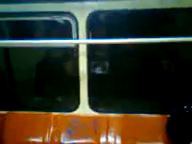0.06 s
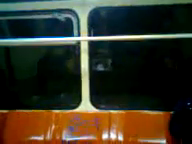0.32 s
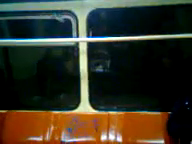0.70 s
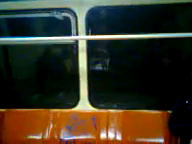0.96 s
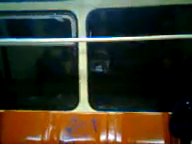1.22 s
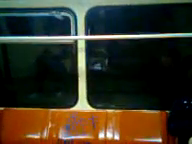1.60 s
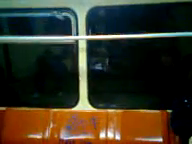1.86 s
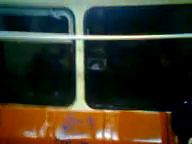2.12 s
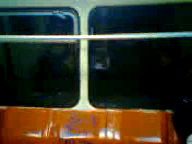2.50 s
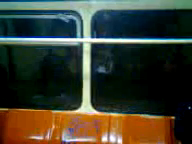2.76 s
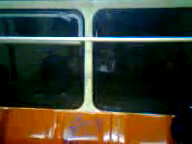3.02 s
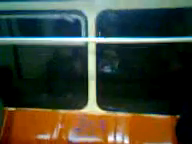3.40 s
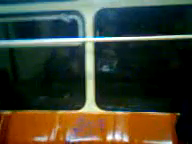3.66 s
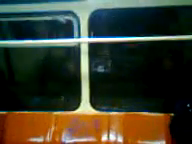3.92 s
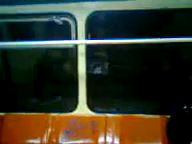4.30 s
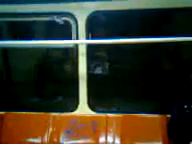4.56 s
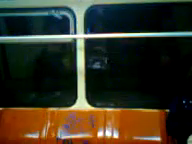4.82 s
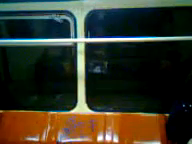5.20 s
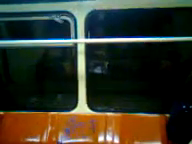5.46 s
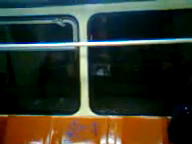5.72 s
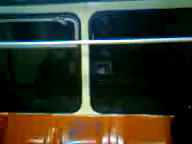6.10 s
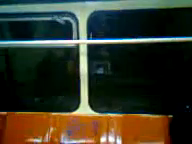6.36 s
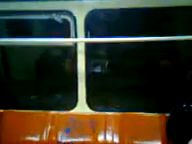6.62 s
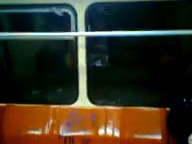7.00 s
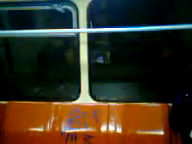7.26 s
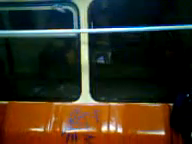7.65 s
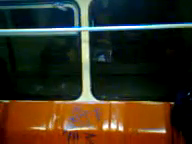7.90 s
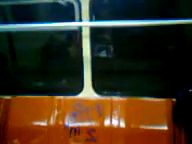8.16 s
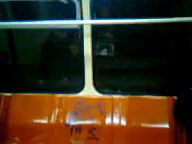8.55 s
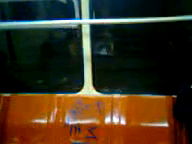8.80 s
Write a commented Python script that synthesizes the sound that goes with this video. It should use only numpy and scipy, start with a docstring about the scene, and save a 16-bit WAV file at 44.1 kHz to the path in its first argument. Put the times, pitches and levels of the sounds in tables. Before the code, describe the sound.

A deep rumble and a hissing roar of steel wheels fill a metro carriage slowing in a tunnel. Behind them a fluttering motor whine gradually sinks over a low air drone. The wheels knock and clatter over rail joints, once early and in a cluster midway, with brief rasping squeals. The loudest clatter and squealing come at the end, clipping with a faint crackle. Heard from a seat, the sound is dull and narrow-band.

```python
"""A deep rumble and a roar of wheels on rails, heard inside a metro carriage slowing in a tunnel.
Rough steel rolling on steel shakes the body and hisses; the wheels knock and clatter over rail joints.
Their flanges (the rims that keep them on the track) rub and ring, hardest at the end.
Behind this the motor's whine sinks and air drones in the tunnel.
The sound is dull and narrow-band, and its loudest peaks clip with a faint crackle."""
import sys
import numpy as np
from scipy import signal
from scipy.fft import rfft, irfft, next_fast_len
from scipy.io import wavfile
from scipy.ndimage import uniform_filter1d, map_coordinates

SR = 44100
rng = np.random.default_rng(int(sys.argv[2]) if len(sys.argv) > 2 else 0)


def unload_audio(sound):
    """Save the sound as a 16-bit wav file, at the path given as the first command line argument."""
    columns = np.transpose(np.atleast_2d(sound))
    # keep every value between -1 and 1, then stretch to whole-number steps
    steps = np.round(np.clip(columns, -1, 1) * 32767)
    wavfile.write(sys.argv[1], SR, steps.astype(np.int16))


N = 389844
TIME = np.arange(N) / SR
WHINE_HZ, FALL_HZ_PER_S = 610.4, 17.5  # the motor's starting pitch, and its fall as the train slows


# the tone of the rumble: (frequency [Hz], relative level [dB])
RUMBLE_TONE = [(15, -50.5), (30, -40), (55, -17.5), (100, -18), (160, -8.5), (230, -2), (295, 2),
               (400, -.5), (520, -4.5), (680, -12), (1000, -21), (2000, -52)]
# the carriage shudders over uneven track: (time [s], length [s], level [dB])
TRACK_SHUDDERS = [(.05, 0.32, -42), (.68, 0.48, -39), (1.31, 0.047, -33.5), (1.506, 0.033, -35),
                  (2.566, 0.073, -34.5), (3.346, .1, -32), (3.48, 0.053, -29), (3.675, 0.38, -31.5),
                  (4.075, .17, -34), (4.608, 0.23, -27), (5.14, 0.14, -31.5), (5.42, 0.29, -36),
                  (6.446, .08, -34.5), (6.96, 1.6, -33), (7.05, 0.18, -30.5), (7.48, 0.21, -32),
                  (7.983, .06, -30.5), (8.17, 0.14, -29), (8.452, 0.074, -23.5), (8.512, .17, -17),
                  (8.71, 0.092, -16.5)]

def body_rumble():
    """Rolling wheels shake the carriage body, harder where the track is uneven."""
    steady_db = -38 - 1.6 * np.log2(speed())  # 1.6 dB louder at half speed
    shaking = swelling(steady_db, TRACK_SHUDDERS, attack_s=0.01, release_s=0.066)
    return shaking * amp(1.2 * wobble(16)) * patchy(noise(colour(RUMBLE_TONE)), depth_db=1.6)


# the tones of the roar and of the hiss: (frequency [Hz], relative level [dB])
ROAR_TONE = [(150, -21), (350, -6), (520, 2.5), (640, 5), (760, 0), (1000, -0.1), (1280, -1), (1540, 2.5),
             (1850, 0.64), (2200, -10.5), (3000, -17.5), (4400, -41.5)]
HISS_TONE = [(900, -33.5), (1600, -11.5), (2000, 1), (2350, 2.5), (2700, 0.5), (3000, 1), (3300, 3.5),
             (3550, 2.5), (3900, -2), (4600, -8), (5200, -46.5)]
# the steady hiss, a little softer once the train is slower: (time [s], level [dB])
HISS_LEVELS = [(0, -34), (2.0, -33), (3.6, -32.5), (4.5, -35.5), (6.0, -36.5), (8.3, -35.5)]
# wheels grind over rough rail: (time [s], length [s], roar level [dB], hiss level [dB])
ROUGH_STRETCHES = [(0.273, 0.12, -33.5, -35), (0.926, 0.22, -49, -31.5), (1.01, 0.071, -30.5, -32),
                   (1.115, 0.13, -35, -39), (1.946, 0.054, -33.5, -33.5), (3.368, 0.12, -31.5, -38.5),
                   (3.787, .5, -32.5, -34.5), (3.82, 0.032, -21.5, -28), (3.921, .07, -25.5, -29.5),
                   (4.031, 0.17, -39, -31), (4.638, 0.41, -32, -32), (4.702, 0.25, -29, -30.5),
                   (7.544, 0.11, -33.5, -40), (7.902, 0.087, -33.5, -35.5), (8.095, 0.19, -30, -35),
                   (8.19, 0.039, -40, -36), (8.376, .05, -37, -27), (8.42, .12, -22, -24),
                   (8.53, .26, -22.5, -21), (8.576, 0.046, -20, -20), (8.739, 0.015, -19.5, -31)]

def wheel_roar_and_hiss(attack_s=0.0078, release_s=0.05):
    """Rough steel rolls on steel: the tunnel roars, and the spot where they touch hisses and crackles."""
    start, length, roar_db, hiss_db = np.transpose(ROUGH_STRETCHES)
    steady_roar_db = -31 + 8 * np.log2(speed())  # 8 dB softer at half speed
    roar_gain = swelling(steady_roar_db, zip(start, length, roar_db), attack_s, release_s)
    hiss_gain = swelling(curve(HISS_LEVELS), zip(start, length, hiss_db), attack_s, release_s)
    roar = roar_gain * amp(0.6 * wobble(22)) * patchy(noise(colour(ROAR_TONE)), depth_db=1.66)
    grit = unit(filtered(impacts(per_second=550, spread_db=3.5), colour(HISS_TONE)))
    hiss = patchy(noise(colour(HISS_TONE)), depth_db=2.5)
    return roar + hiss_gain * amp(0.64 * wobble(45)) * unit(hiss + amp(-6) * grit)


# wheels hit rail joints: (time [s], thump level [dB], clatter level [dB], time to fade by 60 dB [s])
JOINT_HITS = [(1.05, -27, -31.5, .3), (3.685, -31.5, -33, 0.36), (3.821, -37.5, -17, 0.66),
              (3.974, -31, -30.5, 0.35), (4.635, -19.5, -22.5, 0.23), (4.751, -35.5, -19.5, 0.59),
              (4.955, -25, -26, 0.32), (5.29, -34, -47, 0.18), (8.426, -22, -20.5, 0.99),
              (8.557, -17.5, -17.5, 0.32), (8.583, -13.5, -25.5, 0.26), (8.644, -18.5, -24, .2),
              (8.73, -17.5, -21.5, .25), (8.79, -14, -31.5, 0.24)]
# the notes the carriage booms at: (frequency [Hz], width [Hz], relative level [dB])
CARRIAGE_NOTES = [(235, 57, -13), (313, 79, -2), (331, 45, -1), (420, 70, -9), (480.5, 37, -3.5),
                  (675, 130, -21.5)]
# the tone of loose steel: (frequency [Hz], relative level [dB])
STEEL_TONE = [(20, -33), (90, -0.5), (250, -7.5), (500, 1.5), (950, 4.5), (1350, -11), (1900, -12.5),
              (2600, 5.5), (3500, -5.5), (4600, -10), (6000, -35)]

def joint_knocks(attack_s=0.016):
    """Each joint thumps the carriage and sets loose steel clattering; the tunnel draws the sound out."""
    thump_gain, clatter_gain = np.zeros((2, N))
    for start, thump_db, clatter_db, fade_s in JOINT_HITS:
        age = np.maximum(TIME - start, 0)
        blow = (1 - np.exp(-age / attack_s)) * amp(-60 * age / fade_s)
        thump_gain += amp(thump_db) * blow
        clatter_gain += amp(clatter_db) * blow
    rattle = unit(filtered(impacts(per_second=2500, spread_db=2.0), colour(STEEL_TONE)))
    boom = unit(np.tanh(0.88 * noise(resonances(CARRIAGE_NOTES))))  # the panels stiffen as they swing
    return thump_gain * boom + clatter_gain * rattle


# a flange rubs the rail and the wheel sings: (time [s], length [s], pitch [Hz], level [dB])
FLANGE_RUBS = [(1.024, 0.037, 3560, -26), (3.836, 0.079, 2390, -32), (3.873, 0.065, 3040, -30.5),
               (3.972, 0.076, 2310, -30.5), (4.155, 0.098, 3480, -32), (4.774, 0.025, 2350, -29),
               (8.121, 0.066, 3510, -38.5), (8.399, 0.066, 3552, -14), (8.514, 0.033, 3527, -16)]
# the tone of a rasping wheel: (frequency [Hz], relative level [dB])
WHEEL_TONE = [(900, -24), (1700, -8), (1980, -2.5), (2100, -0.5), (2220, 2), (2400, 0.5), (2820, -4),
              (2960, 4), (3120, 0.5), (3700, -1), (4400, 1), (5000, -39)]

def flange_squeals(width_hz=180, rasp_db=-2.5):
    """A flange sticks and slips: the whole wheel rasps, and one of its notes sings and rings briefly."""
    squeals, pressure = np.zeros((2, N + SR))
    for start, length, hz, db in FLANGE_RUBS:
        rub = amp(db) * swell(TIME[:SR], length, attack_s=0.0045, release_s=0.053)
        narrow_band = signal.iirpeak(hz, hz / width_hz, SR)
        note = unit(signal.filtfilt(*narrow_band, rng.standard_normal(SR)))
        first = round(start * SR)
        squeals[first:first + SR] += rub * unit(np.tanh(note))  # friction limits the swing
        pressure[first:first + SR] += rub
    return squeals[:N] + amp(rasp_db) * pressure[:N] * noise(colour(WHEEL_TONE))


# how loud the motor whines: (time [s], level [dB])
WHINE_LEVELS = [(0, -44), (1.1, -45.5), (2.1, -40.5), (3.4, -42), (4.3, -47), (5.0, -37), (5.6, -43),
                (6.25, -44), (6.55, -35.5), (6.85, -48.5)]

def motor_whine(blur_hz=24):
    """The whine sinks with the speed; echoes in the tunnel blur it and make it flutter."""
    phase = 2 * np.pi * np.cumsum(WHINE_HZ * speed()) / SR
    flutter = 0.15 + wobble(2 * blur_hz) + 1j * wobble(2 * blur_hz)  # shakes both level and phase
    return amp(curve(WHINE_LEVELS)) * unit(np.real(flutter * np.exp(1j * phase)))


# the tone of the tunnel air: (frequency [Hz], relative level [dB])
DRONE_TONE = [(15, -41.5), (30, -20), (60, -3.5), (100, 1), (160, 1), (300, -10.5), (600, -45.5)]

def tunnel_drone(level_db=-52):
    """Air pushed along the tunnel makes a deep, even drone."""
    return amp(level_db + wobble(4)) * noise(colour(DRONE_TONE))


def speed():
    """The train slows evenly; 1 is its speed at the start."""
    return 1 - FALL_HZ_PER_S * TIME / WHINE_HZ


def swell(age, length, attack_s, release_s):
    """A gain that rises, holds until length seconds have passed, then dies away."""
    return (1 - np.exp(-age / attack_s)) * np.exp(-np.maximum(age - length, 0) / release_s)


def swelling(steady_db, swells, attack_s, release_s):
    """The gain of a steady level plus swells (time [s], length [s], level [dB]); their powers add."""
    power = amp(steady_db) ** 2
    for start, length, db in swells:
        age = np.maximum(TIME - start, 0)
        power = power + (amp(db) * swell(age, length, attack_s, release_s)) ** 2
    return np.sqrt(power)


def patchy(x, depth_db):
    """Uneven rail: the strength of x drifts in patches of time and frequency."""
    spectrum = signal.stft(x, nperseg=1024)[2]
    patches = uniform_filter1d(rng.standard_normal(spectrum.shape), size=7, axis=0)
    patches = uniform_filter1d(patches, size=7, axis=1)
    return unit(signal.istft(spectrum * amp(depth_db * unit(patches)), nperseg=1024)[1][:N])


def impacts(per_second, spread_db):
    """Tiny random clicks of uneven size."""
    clicks = (rng.random(N) < per_second / SR) * rng.choice([-1, 1], N)
    return clicks * amp(spread_db * rng.standard_normal(N))


def wobble(per_second):
    """A smooth curve through so many random values a second."""
    return map_coordinates(rng.standard_normal(int(TIME[-1] * per_second) + 4), [TIME * per_second])


def noise(response):
    """Filtered noise with an average (rms) size of 1."""
    return unit(filtered(rng.standard_normal(N), response))


def filtered(x, response):
    """Filter x; response gives the gain at each frequency."""
    size = next_fast_len(N + SR // 4)
    return irfft(rfft(x, size) * response(np.fft.rfftfreq(size, 1 / SR)), size)[:N]


def colour(points):
    """A filter response that joins the points of a tone table."""
    frequencies, db = np.transpose(points)
    return lambda hz: amp(np.interp(np.log(hz + 1), np.log(frequencies), db))


def resonances(notes):
    """A filter response with one peak for each ringing note."""
    return lambda hz: sum((-1) ** k * amp(db) * 1j * hz * width / (peak**2 - hz**2 + 1j * hz * width)
                          for k, (peak, width, db) in enumerate(notes))


def curve(points):
    """Join (time [s], level [dB]) points into one level per sample."""
    return np.interp(TIME, *np.transpose(points))


def amp(db):
    """Turn decibels into a gain."""
    return 10 ** (np.asarray(db) / 20)


def unit(x):
    """Scale x to an average (rms) size of 1."""
    return x / np.sqrt(np.mean(x ** 2) + 1e-20)


def scene():
    """Everything as heard from a seat, in one channel."""
    ride = tunnel_drone() + body_rumble() + wheel_roar_and_hiss()
    return (ride + joint_knocks() + flange_squeals() + motor_whine())[None]


# how the treble falls away: (frequency [Hz], gain [dB])
TREBLE_CUT = [(3570, 0), (3720, -2.5), (3900, -7.5), (4150, -12.5), (4400, -18), (4600, -38.5), (4900, -93)]

def record(dry, ceiling=0.75, top_hz=15900):
    """The sound is dull and narrow-band, and its loudest peaks clip with a faint crackle."""
    dulled = filtered(dry[0], colour(TREBLE_CUT))
    clipped = np.clip(dulled, -ceiling, ceiling)
    return filtered(clipped, lambda hz: hz < top_hz)[None]


dry = scene()
out = record(dry)
unload_audio(out)
```